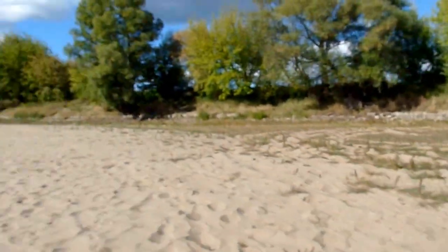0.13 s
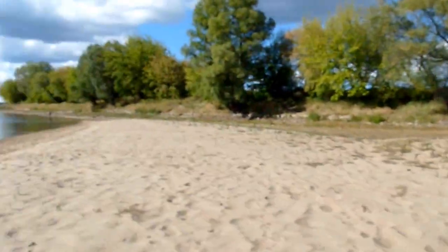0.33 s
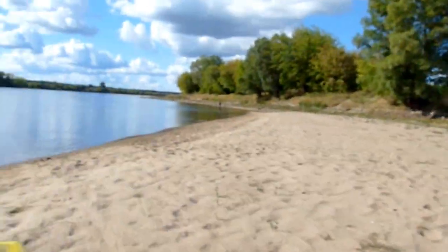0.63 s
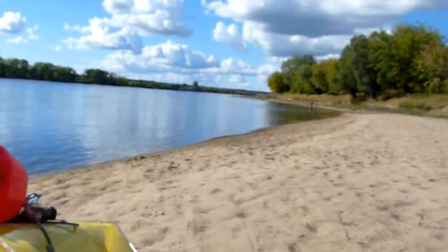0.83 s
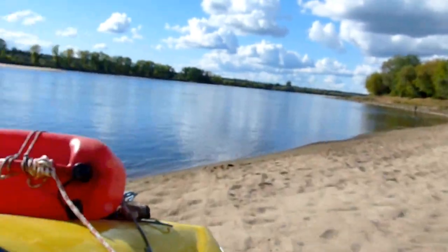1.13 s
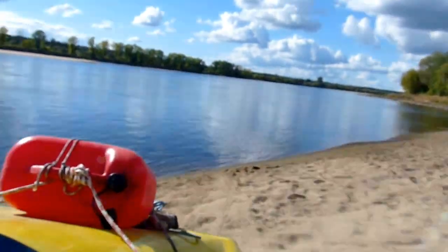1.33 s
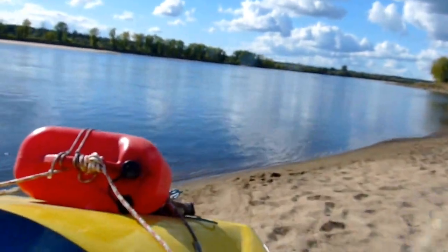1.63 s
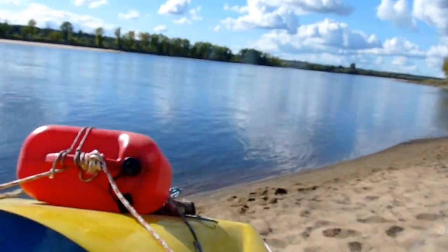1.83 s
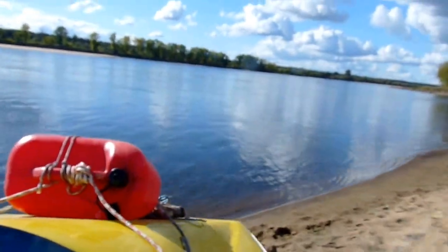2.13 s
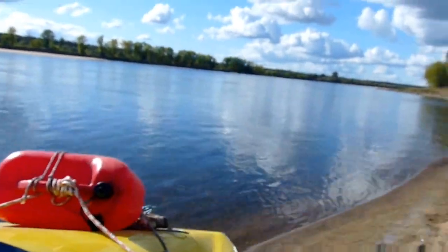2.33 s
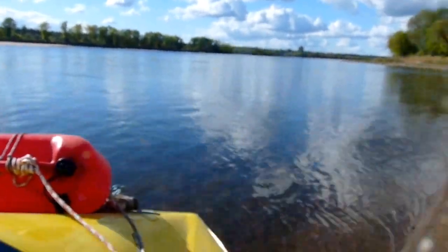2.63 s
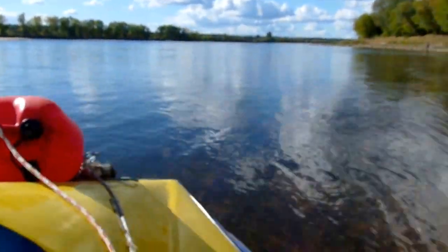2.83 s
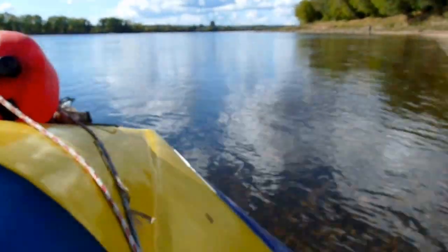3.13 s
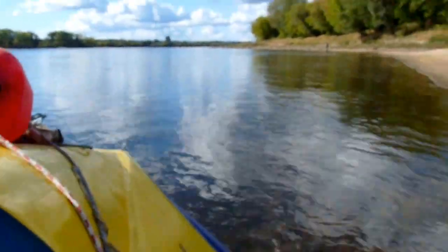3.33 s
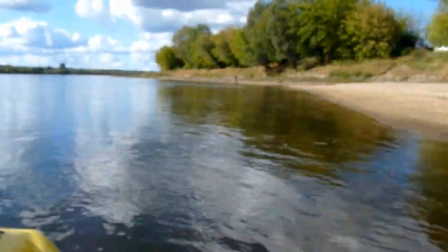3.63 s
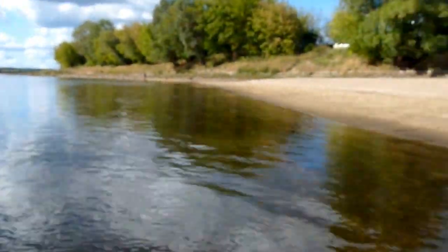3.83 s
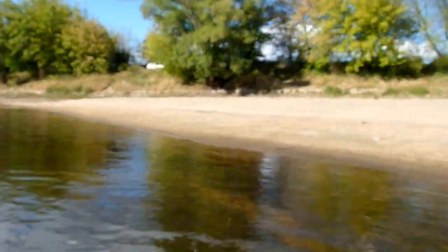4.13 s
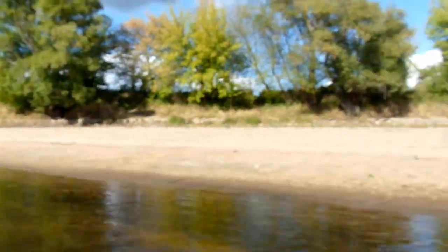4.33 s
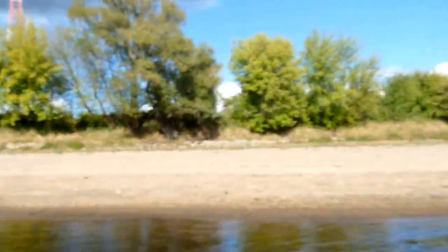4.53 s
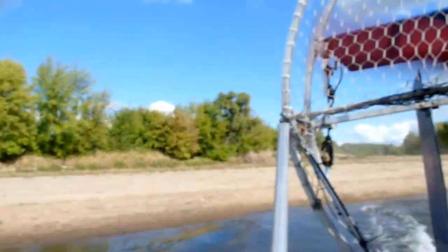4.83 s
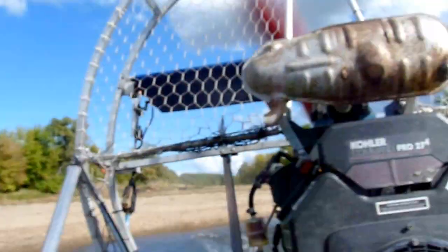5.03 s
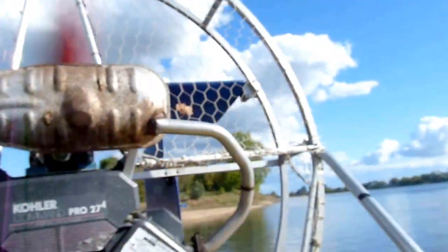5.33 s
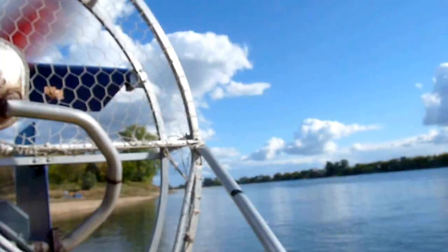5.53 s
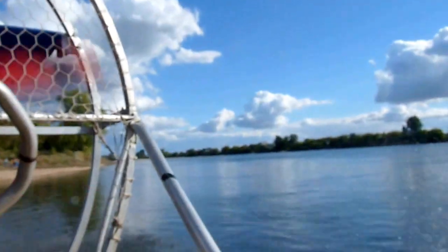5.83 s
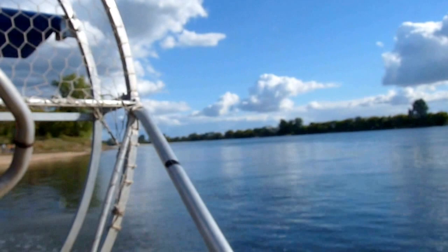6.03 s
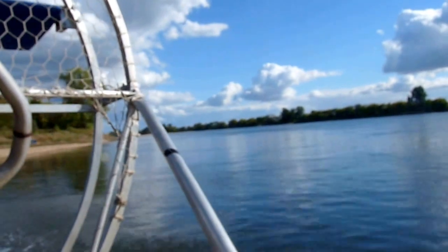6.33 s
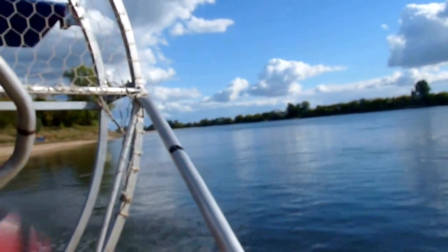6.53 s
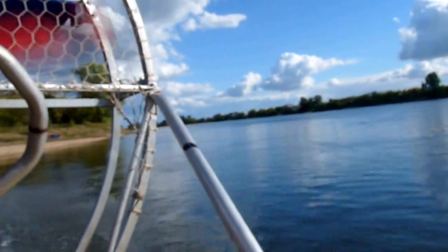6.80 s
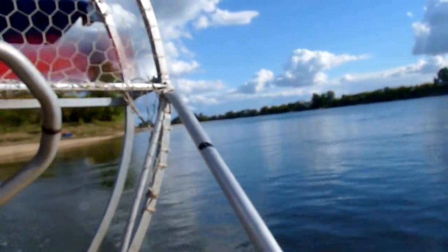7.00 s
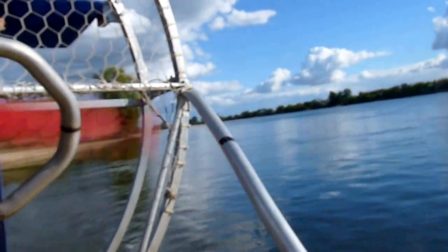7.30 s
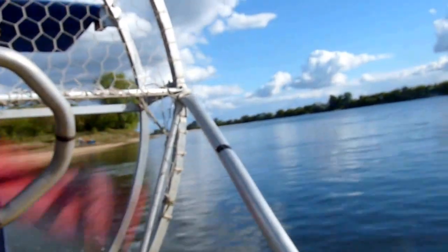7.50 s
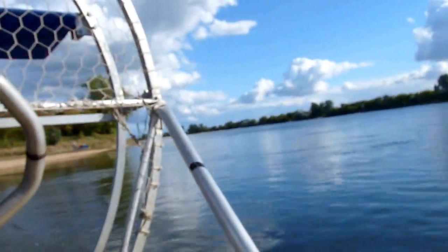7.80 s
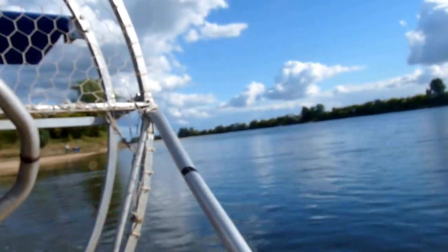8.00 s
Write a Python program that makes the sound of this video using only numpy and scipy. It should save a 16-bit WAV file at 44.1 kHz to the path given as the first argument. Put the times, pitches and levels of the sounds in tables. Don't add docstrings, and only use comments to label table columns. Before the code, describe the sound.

Aboard a hovercraft, a caged propeller's chopped roar sags in pitch, then climbs to a fast, steady howl over a droning engine and rushing air.

```python
import sys
import numpy as np
from scipy import signal
from scipy.fft import rfft, irfft, next_fast_len
from scipy.io import wavfile

SR = 44100
rng = np.random.default_rng(int(sys.argv[2]) if len(sys.argv) > 2 else 0)


def store_wav(level_fs):
    pcm = np.round(np.clip(np.atleast_2d(level_fs), -1, 1) * 32767)
    wavfile.write(sys.argv[1], SR, pcm.T.astype(np.int16))


def convert_level_to_amplitude(level_db):
    exponent = np.asarray(level_db, float) / 20
    return 10 ** exponent


N = 359856
BASS_CUT_HZ, TREBLE_CUT_HZ = 104.6, 3730


def rms_one(x):
    return x / np.sqrt(np.mean(x ** 2) + 1e-20)


def in_time(rows):
    s, *columns = np.transpose(rows)
    return [np.interp(np.arange(N) / SR, s, c) for c in columns]


def drift(rate):
    r = np.exp(-80 * np.pi * rate / SR)
    noise = rng.standard_normal(N // 40 + 2002)
    slow = signal.lfilter([1], [1, -2 * r, r * r], noise)[2000:]
    return np.interp(np.arange(N) / 40, np.arange(len(slow)), rms_one(slow))


def passed(x, order, hz, kind):
    return signal.sosfilt(signal.butter(order, hz, kind, fs=SR, output="sos"), x)


def at_capsule(hz):
    lost = (1 + (BASS_CUT_HZ / hz) ** 4) * (1 + (hz / TREBLE_CUT_HZ) ** 8)
    return np.minimum(np.sqrt(lost), convert_level_to_amplitude(30))


def air_noise(spectrum, patchy_db, lumps_hz):
    size = next_fast_len(N)
    hz = np.maximum(np.fft.rfftfreq(size, 1 / SR), 1)
    point_hz, point_db = np.transpose(spectrum)
    colour = convert_level_to_amplitude(np.interp(np.log(hz), np.log(point_hz), point_db, -120, -120))
    shaped = rfft(rng.standard_normal(size)) * colour
    shaped *= size / np.sqrt(2 * np.sum(np.abs(shaped) ** 2))
    pressure = shaped * at_capsule(hz)
    half_octave = 2 * np.log2(hz)
    lowest, highest = int(2 * np.log2(point_hz[0])), int(2 * np.log2(point_hz[-1])) + 1
    together, out = drift(lumps_hz), 0
    for k in range(lowest, highest + 1):
        band = irfft(pressure * np.clip(1 - np.abs(half_octave - k), 0, 1), size)[:N]
        flicker = .8 * together + drift(lumps_hz)
        out = out + band * convert_level_to_amplitude(patchy_db * flicker)
    return out


def turning(hz):
    return 2 * np.pi * np.cumsum(hz * (1 + .001 * drift(13.4))) / SR


def tones(angle, hz, orders, levels_db, waver_db, scatter=1, split=0):
    out = 0
    for k, level_db in zip(orders, levels_db):
        gain = convert_level_to_amplitude(level_db + waver_db * drift(3.9)) * at_capsule(k * np.mean(hz))
        phase = scatter * rng.uniform(-np.pi, np.pi) + split * (k % 2)
        out = out + np.sqrt(2) * gain * np.cos(k * angle + phase)
    return out


# time in seconds, stage of the turn (0 to 3).
TURN = [
    (0, 0),
    (.55, 0),
    (1.2, 1),
    (4.25, 1),
    (4.55, 2),
    (5.15, 2),
    (5.5, 3),
    (8.16, 3),
]


def by_stage(values):
    turn, = in_time(TURN)
    return np.interp(turn, range(4), values)


# stage of the turn, buffeting in dB, cushion roar in dB, lift tones in dB, change of the blade tones
# in dB, share of the boom hidden (0 to 1).
HEADING = [
    (0, -31.5, -20.5, -37.5, 0.5, 0.35),
    (1, -29.5, -20, -37.5, 0.5, 0),
    (2, -35, -21, -33.5, 1, .5),
    (3, -32, -24.5, -33, 1.5, 0.42),
]


def heading():
    return [by_stage(column) for column in np.transpose(HEADING)[1:]]


# time in seconds, blade passes in Hz.
PROPELLER_SPEED = [(0, 55.15), (.5, 56.2), (.76, 56.3), (1.0, 52.99), (1.25, 48.6), (2.0, 41.55),
                   (2.5, 41.77), (3.12, 48.5), (3.5, 53.2), (4.0, 57.1), (4.5, 59.3), (4.9, 60.55),
                   (5.25, 63.75), (5.5, 65.9), (5.85, 67.9), (6.25, 69.07), (6.9, 70.17), (8.16, 70.72)]
# multiple of the blade passes, level in dB heard ahead, over the bow, abeam, facing the cage.
PROPELLER_TONES = [(1, -4, -11, -8, -24), (2, -1, -2, -1, -9), (3, 0, -9, -3, -11), (4, -.5, -4, 1, .5),
                   (5, -1, 3, 6.5, -9), (6, -5, 5, -8, 3), (7, 0, 1, 1, 3), (8, -4, -1, 5.5, .5),
                   (9, 0, -8.5, -6, 4), (10, 1.5, 2, 0, -2.5), (11, -7, -3, -4, -3.5), (12, -1, -2, 0, -9),
                   (13, -5, -6, -7, -5.5), (14, -.5, -5, -5, -6), (15, -1, -10, -7, -6),
                   (16, -3, -14, -8, -9), (17, -9, -12, -7, -10.5), (18, -12, -14, -11, -10),
                   (19, -20, -18, -14, -10.5), (20, -20, -18, -15, -10.5), (21, -10.5, -22, -19, -14),
                   (22, -15.5, -15, -8, -8), (23, -18, -18, -12, -12), (24, -16, -17, -14, -14)]
# time in seconds, change of level in dB.
COVER = [(0, -4.5), (.5, -5.5), (.9, -5), (1.3, -5), (1.9, 0), (2.3, -2), (2.7, -4), (3.0, -2.5), (3.3, -5),
         (3.6, -3.5), (3.85, -6.5), (4.1, -9.5), (4.35, -4.5), (4.7, -2), (5.1, 0.5), (8.16, -1)]
# frequency in Hz, level in dB per Hz.
RUSH = [(200, -35), (300, -4), (450, -5), (700, -6), (1000, -7.5), (1500, -10.5), (2400, -18.5),
        (3500, -33.5), (4700, -46.5), (6000, -51), (8000, -72.5)]
# stage of the turn, chop of the rush in dB, scatter of the blade pulse (0 to 1),
# split into two beats in radians.
BEAT = [
    (0, 2.7, .3, 0),
    (1, 2.0, .3, 0),
    (2, 1.9, .45, .6),
    (3, .5, .3, 1.2),
]


def propeller(blade_db):
    hz, = in_time(PROPELLER_SPEED)
    cover_db, = in_time(COVER)
    speed_db = 20 * np.log10(hz / 70)
    tone_db = -35 + blade_db + 1.97 * speed_db + 0.37 * cover_db
    rush_db = -24 + 3.64 * speed_db + cover_db
    angle = turning(hz)
    orders = [row[0] for row in PROPELLER_TONES]
    levels = [tone_db + 4 + by_stage(row[1:]) for row in PROPELLER_TONES]
    chop_db, scatter, split = [by_stage(column) for column in np.transpose(BEAT)[1:]]
    chop_db = chop_db * np.clip((hz - 38) / 16, .2, 1)
    chop = convert_level_to_amplitude(chop_db * np.cos(angle) + .5 * np.cos(2 * angle) - chop_db ** 2 / 17)
    rush = convert_level_to_amplitude(rush_db + 4.5) * chop * air_noise(RUSH, patchy_db=0.5, lumps_hz=25.8)
    edge_hiss = passed(rush, 2, 1700, "high")
    rush = rush - 0.25 * (1 - convert_level_to_amplitude(cover_db)) * edge_hiss
    return tones(angle, hz, orders, levels, waver_db=1.2, scatter=scatter, split=split) + rush


# time in seconds, four-stroke cycles in Hz.
LIFT_SPEED = [(0, 24.35), (.8, 24.38), (1.5, 24.28), (2.0, 24.26), (2.5, 24.4), (3.5, 23.91), (4.1, 23.92),
              (4.75, 23.83), (5.3, 23.85), (6.0, 24.13), (7.25, 24.48), (8.16, 24.42)]
# multiple of the cycle, level in dB heard ahead, over the bow, abeam, facing the cage.
LIFT_TONES = [(2, -16.9, -16.9, -19.7, -26.4), (3, -17.2, -17.2, -7.1, -25.2), (4, 2, 0.1, -4.8, -12.5),
              (5, -5.1, -5.1, -5.1, -22.8), (7, -7.2, -7.2, -9.2, -19.7), (8, -8, -11, -3, -17.9),
              (9, -3, 0.1, -14.3, -10), (10, -3, 0, -3.5, -1.5), (12, -3, 1.0, 4, .5),
              (14, -14, -9, -17.9, -17.0), (24, -1, -4.5, -5.5, -5.5), (36, -15, -19, -13, -8)]
# frequency in Hz, level in dB per Hz.
ROAR = [(59, -24), (100, -8), (226, -6.5), (266, -7), (382, -13), (593, -14), (623, -18.5), (897, -23),
        (2000, -37.5), (2600, -61.5), (4400, -120)]


def lift_engine(roar_db, tone_db):
    hz, = in_time(LIFT_SPEED)
    angle = turning(hz)
    orders = [row[0] for row in LIFT_TONES]
    levels = [tone_db + 5.5 + by_stage(row[1:]) for row in LIFT_TONES]
    throb = convert_level_to_amplitude(1.2 * np.cos(angle) + .7 * np.cos(2 * angle + 1.4))
    roar = convert_level_to_amplitude(roar_db - 2) * throb * air_noise(ROAR, patchy_db=1.9, lumps_hz=22)
    return tones(angle, hz, orders, levels, waver_db=2.3) + roar


# time in seconds, time pinned in milliseconds.
GUSTS = [(1.0508, 1.9), (1.107, 2), (1.31, 0.95), (1.553, 1.6), (1.58, 2.6), (1.723, 1.1), (2.0777, 2.7),
         (2.202, 2.14), (3.1234, 4.5), (3.3313, 1.3), (3.3873, 1.7), (3.4322, 1.7), (3.765, 2.9),
         (3.7837, 1.7), (3.81, 1.5), (4.1273, 1.84), (4.233, 2.8), (4.2958, 2.5), (4.3776, 1.8),
         (4.392, 1.5), (4.4108, 1.1), (4.4591, 1.4), (4.6112, 0.59), (5.106, 0.99), (5.28, 1.2),
         (6.9057, 0.43), (7.7244, 1.6), (8.1203, 1.3)]


def gusts():
    s = np.arange(N) / SR
    out = 0
    for at, ms in GUSTS:
        half_width_s = .0007 * ms + .00075
        out = out - np.exp(-np.abs((s - at) / half_width_s) ** 2.8)
    return out


def knock(at, db, hz, t60):
    s = np.maximum(np.arange(N) / SR - at, 0)
    return convert_level_to_amplitude(db - 60 * s / t60) * (1 - np.exp(-s * hz)) * np.sin(2 * np.pi * hz * s)


# time in seconds, peak in dB, pitch in Hz.
SLAPS = [(1.058, -13, 298), (1.148, -12, 296), (1.276, -4, 242), (1.391, -11, 237), (1.519, 4, 176),
         (1.875, 3, 230), (2.09, -6, 223), (2.899, -12, 229), (3.157, 0, 245), (3.273, -11, 301),
         (3.727, -12, 242), (3.783, -5, 175), (4.192, -5, 200), (4.271, -18, 153), (4.327, -22, 151)]


def skirt_slaps():
    return sum(at_capsule(hz) * knock(s + .005, db - 2.5, hz, t60=.03) for s, db, hz in SLAPS)


# time in seconds, level in dB, pitch in Hz.
GRIT = [
    (1.4925, -33, 3050),
    (3.127, -40, 3050),
    (5.261, -24, 2550),
]


def grit_ticks():
    return sum(knock(s, db, hz, t60=.01) for s, db, hz in GRIT)


# frequency in Hz, level in dB per Hz.
BUFFET = [(12, -33.5), (22, -8.5), (40, -2.5), (90, -1.5), (160, -10), (220, 7), (300, -31.5)]


def buffeting(level_db):
    return convert_level_to_amplitude(level_db) * air_noise(BUFFET, patchy_db=1.5, lumps_hz=15)


# time in seconds, swell in dB.
AIRFLOW = [(0, -2.5), (.5, 0.5), (.75, 1), (1.1, 0), (1.5, -4.5), (1.9, 3), (2.15, -2), (2.45, 2),
           (2.9, 1.5), (3.35, -3.5), (3.8, -2), (4.05, 0), (4.3, 4.5), (5.2, 1), (5.7, 3), (6.4, 3.5),
           (7.2, 4), (8.16, 2)]
BOOM_HZ = (79.5, 174)


def scene():
    buffet_db, roar_db, tone_db, blade_db, hidden = heading()
    swell_db, = in_time(AIRFLOW)
    thrust = propeller(blade_db)
    bow = lift_engine(roar_db + 0.72 * swell_db, tone_db) + buffeting(buffet_db + 0.9 * swell_db)
    boom = passed(bow, 1, BOOM_HZ, "band")
    bow = bow - np.clip(hidden, 0, 1) * boom
    return (thrust + bow + gusts() + skirt_slaps() + grit_ticks())[None]


def squash(x, top, knee):
    return x / (1 + np.abs(x / top) ** knee) ** (1 / knee)


def circuit_noise(shape):
    hiss = convert_level_to_amplitude(-74 + 10.6) * rng.standard_normal(shape)
    whine = np.sqrt(2) * convert_level_to_amplitude(-86) * np.sin(2 * np.pi * 6665 * np.arange(N) / SR)
    return hiss + whine


def roll_off(x):
    return signal.sosfilt(signal.butter(12, 8830, fs=SR, output="sos"), x)


def record(dry):
    swing = dry - 0.036
    capsule = squash(swing, np.where(swing > 0, .36, .26), knee=4.05)
    x = passed(convert_level_to_amplitude(-1.61) * capsule, 2, BASS_CUT_HZ, "high")
    x = squash(x, .255, knee=7)
    x = passed(x, 4, TREBLE_CUT_HZ, "low")
    x = x + circuit_noise(x.shape)
    x = signal.sosfilt(signal.cheby2(11, 36, 8520, fs=SR, output="sos"), x)
    return roll_off(x - .0136)


dry = scene()
out = record(dry)
store_wav(out)
```